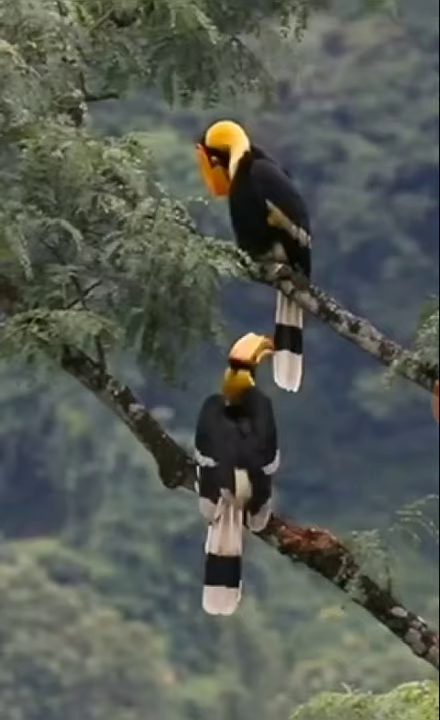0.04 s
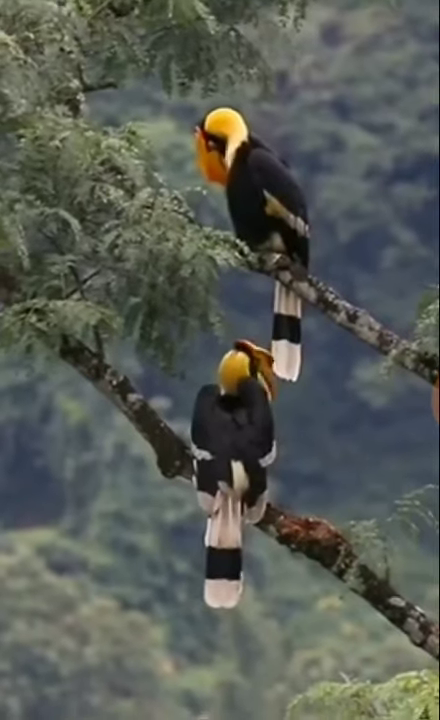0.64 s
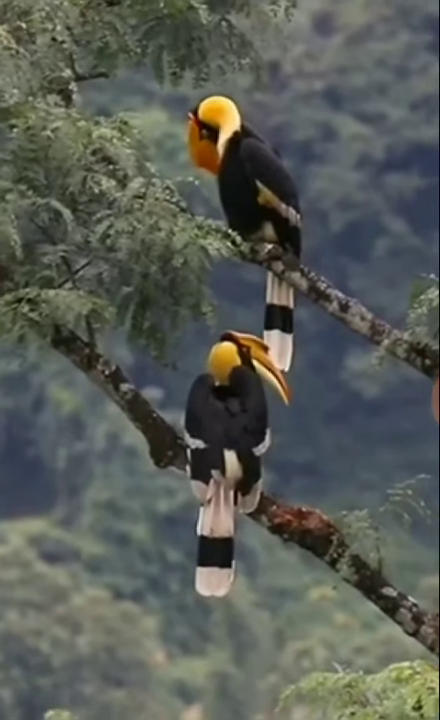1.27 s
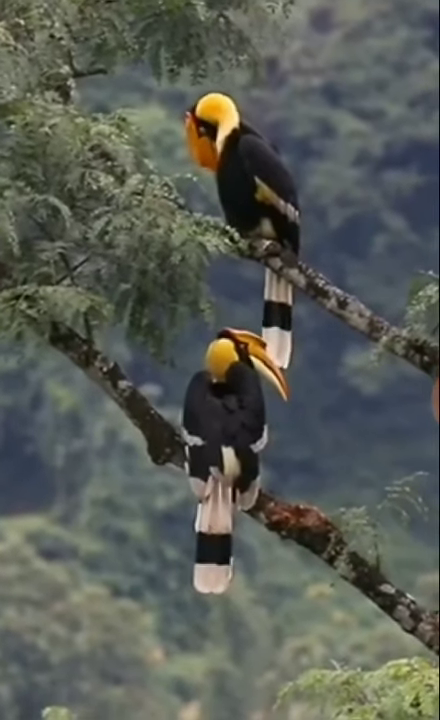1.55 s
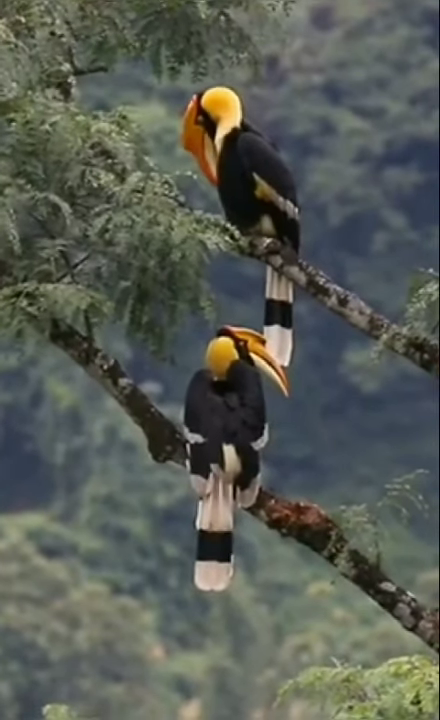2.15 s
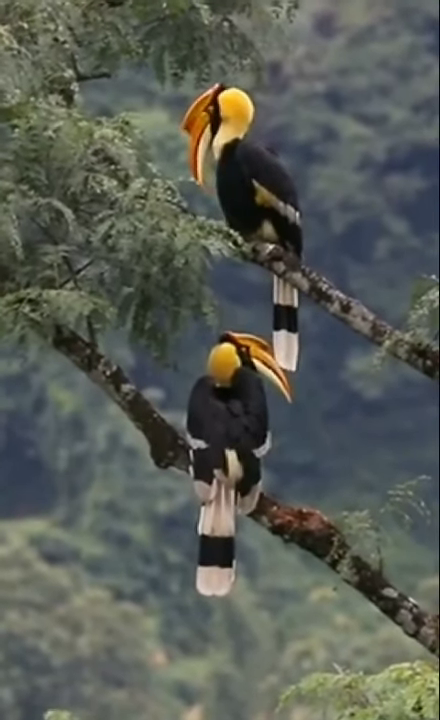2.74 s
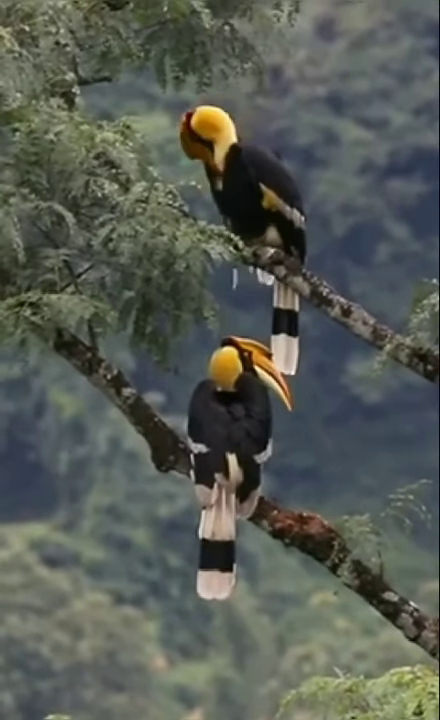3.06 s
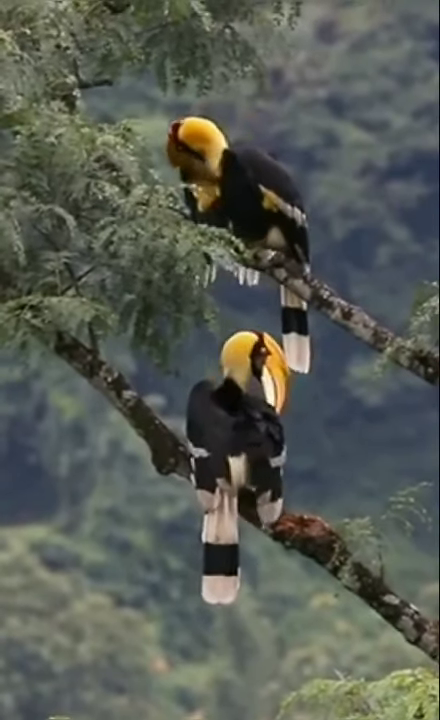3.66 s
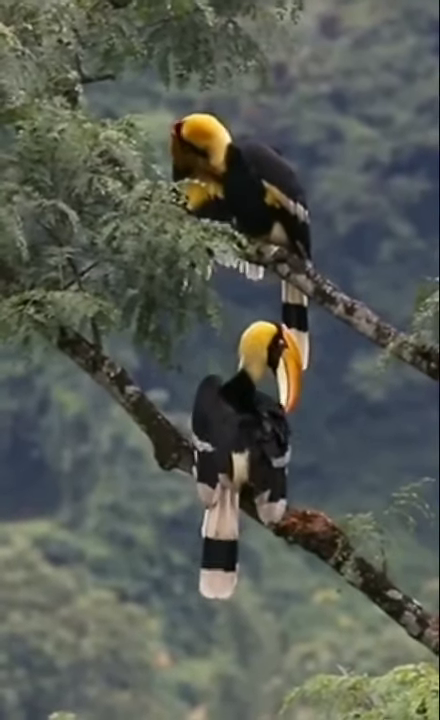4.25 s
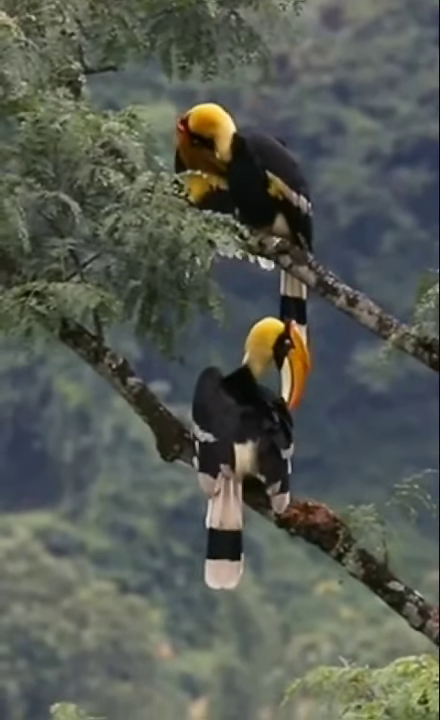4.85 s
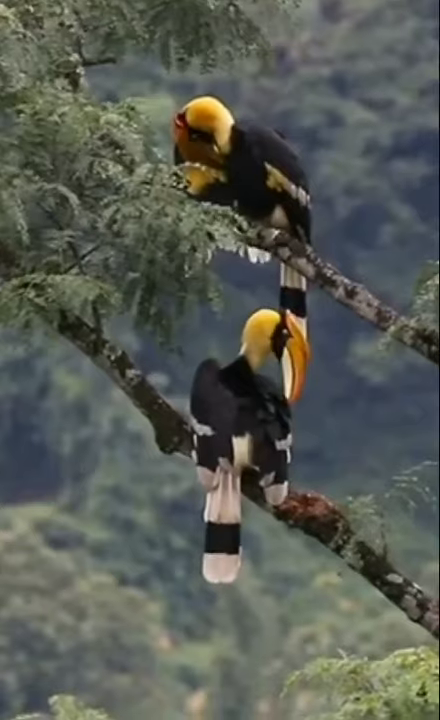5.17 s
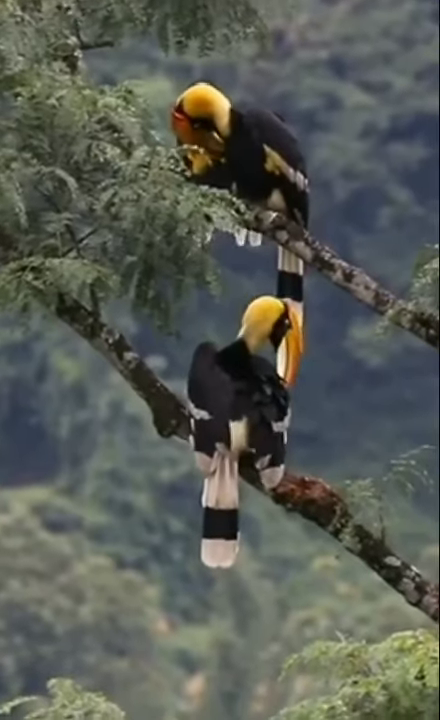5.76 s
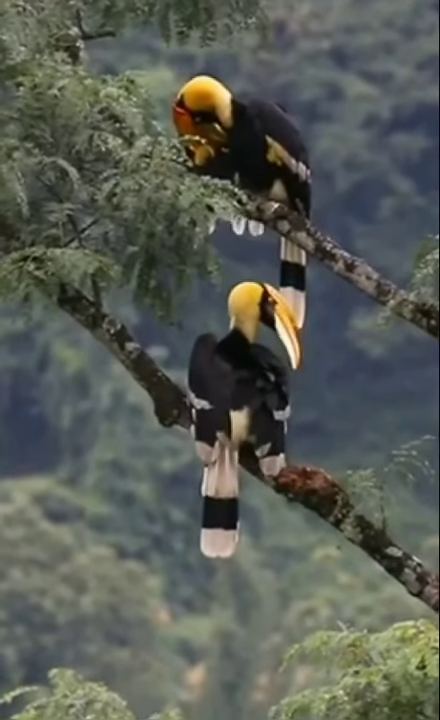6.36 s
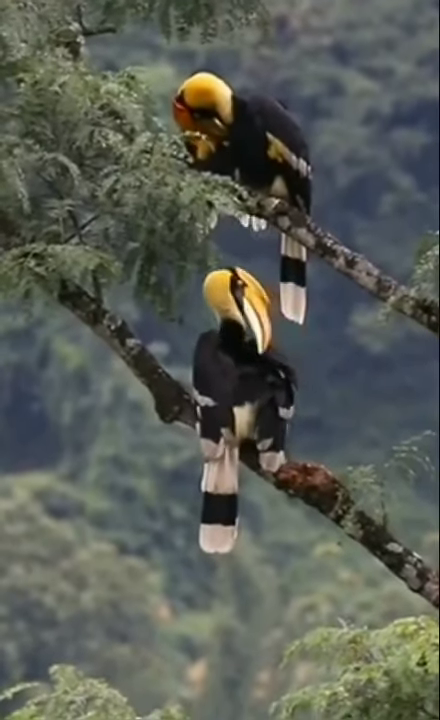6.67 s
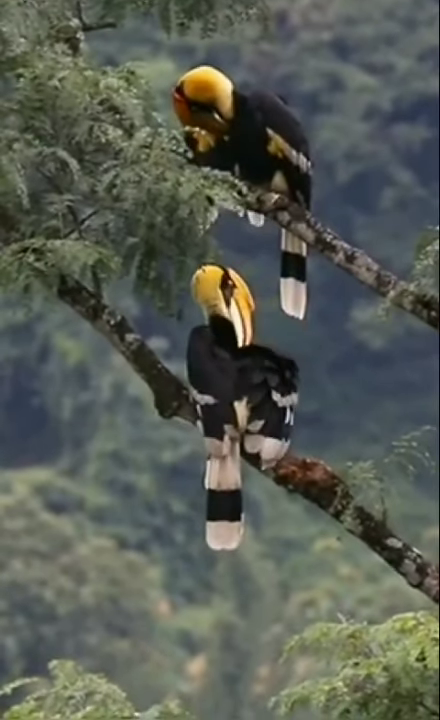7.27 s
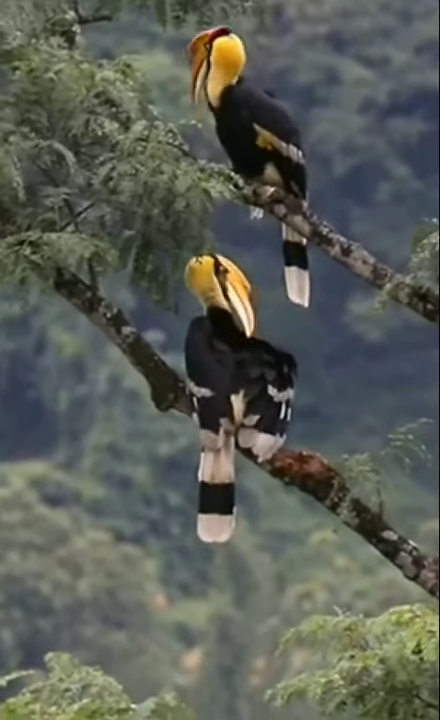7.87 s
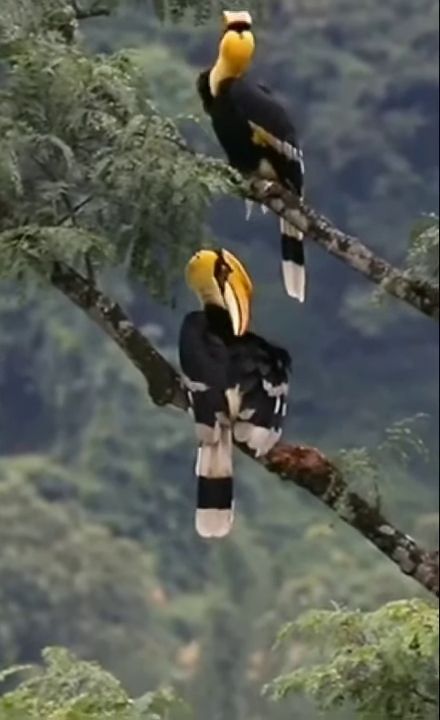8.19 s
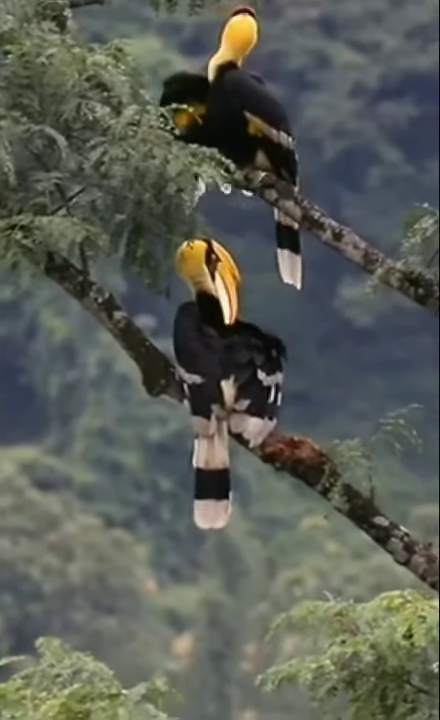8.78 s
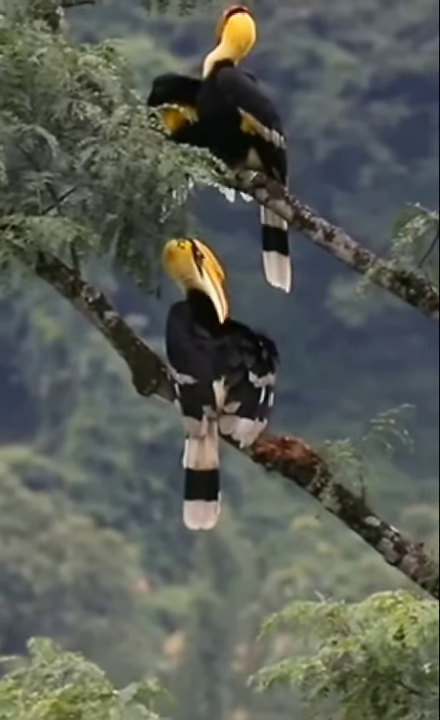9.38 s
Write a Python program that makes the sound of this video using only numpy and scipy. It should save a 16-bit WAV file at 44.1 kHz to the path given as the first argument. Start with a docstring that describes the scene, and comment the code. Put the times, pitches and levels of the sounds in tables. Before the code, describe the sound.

In a forest valley, a bird's raspy, nasal calls repeat rapidly, swell and then thin out, each with a short echo from the trees. Faint chirps and gliding songbird whistles fill the gaps over a soft breeze and a wavering, far-off drone. The harsh calls return in brief bursts, a single dull knock follows, and a second bird finishes with alternating soft hoots and hoarse squeals, picked up in the open air.

```python
"""A bird's harsh, half-voiced calls come in quick series, over a low far-off drone and light wind.
Each call mixes regular and chaotic vibration of the syrinx, shaped by throat, mouth and bill.
Distant burry notes, thin chirps, a faint hum and a songbird's whistles come and go. Near the end,
after one dull knock, a second bird alternates soft hoots and squeals.
The trees of the forest valley echo every call."""
import sys
import numpy as np
from scipy import signal
from scipy.fft import rfft, irfft, next_fast_len
from scipy.io import wavfile
from scipy.ndimage import map_coordinates

SR = 44100
rng = np.random.default_rng(int(sys.argv[2]) if len(sys.argv) > 2 else 0)


def store_wav(level_fs):
    """Save 16-bit WAV to argv[1]."""
    pcm = np.round(np.clip(np.atleast_2d(level_fs), -1, 1) * 32767)
    wavfile.write(sys.argv[1], SR, pcm.T.astype(np.int16))


N = 419832
TOP_HZ = 15000


def amp(db):
    """Decibels to gain."""
    return 10 ** (np.asarray(db) / 20)


def unit(x):
    """Scale to rms 1."""
    return x / np.sqrt(np.mean(x ** 2) + 1e-20)


def along(points, hz):
    """Read (Hz, value) points on a log axis."""
    f, v = np.transpose(points)
    return np.interp(np.log(hz + 1), np.log(f + 1), v)


def curves(rows):
    """One value per sample for each column after the time."""
    times_s, *columns = np.transpose(rows)
    return [np.interp(np.arange(N) / SR, times_s, column) for column in columns]


def wobble(rate_hz, size=N):
    """Smooth random curve, rate_hz knots a second."""
    knots = rng.standard_normal(int(size * rate_hz / SR) + 4)
    return map_coordinates(knots, [np.arange(size) * rate_hz / SR])


def filtered(x, response):
    """Apply a frequency response."""
    n = x.shape[-1]
    m = next_fast_len(n + 2048)
    return irfft(rfft(x, m) * response(np.fft.rfftfreq(m, 1 / SR)), m)[..., :n]


def peak(hz, centre_hz, width_hz):
    """Gain of one resonance, 1 at its centre."""
    return 1 / (1 + (2 * (hz - centre_hz) / width_hz) ** 2)


def add(track, start_s, x):
    """Mix x into the track."""
    part = track[:, round(start_s * SR):][:, :x.shape[-1]]
    part += x[:, :part.shape[1]]


def swell(length_s, rise_s, fall_s):
    """Progress u through a note (1 at length_s) and its envelope."""
    t = np.arange(int((length_s + fall_s / 2) * SR)) / SR
    return t / length_s, np.clip(t / rise_s, 0, 1) * np.clip((t[-1] - t) / fall_s, 0, 1)


def arch(hz, u, bend, crest):
    """Pitch rises with the pressure behind a note and sags as it ends."""
    return hz * (1 - bend * (2 * (u - crest)) ** 2)


def phase(pitch_hz):
    """Running phase in radians."""
    return 2 * np.pi * np.cumsum(pitch_hz) / SR


# Forest reverberation. Each row: frequency in Hz, T60 in seconds.
FOREST_T60 = [(500, 0.39), (2200, 0.52), (4500, 0.65), (8000, 0.63), (14000, 0.64)]


def outdoors(x, lag_ms, pan_db, wet_db):
    """Direct sound, lag_ms later on the right, plus scatter from near branches and far trees."""
    hz, t, noise = signal.stft(rng.standard_normal((2, SR * 3 // 4)), SR, nperseg=256)
    trees = amp(-60 * t / along(FOREST_T60, hz)[:, None])
    branches = amp(7 - 60 * t / .017)
    tail = signal.istft(noise * (trees + branches), SR, nperseg=256)[1]
    echo = signal.fftconvolve(x[None], tail / np.linalg.norm(tail[0]), axes=1)
    side = np.array([[1], [-1]]) / 2
    padded = np.pad(x, (0, echo.shape[1] - len(x)))
    direct = filtered(padded, lambda f: np.exp(2j * np.pi * f * side * lag_ms / 1000))
    return amp(side * pan_db) * (direct + amp(wet_db) * echo) / np.hypot(1, amp(wet_db))


def rasp(beat_hz, throat, scatter, hiss, shudder_db):
    """Chaotic vibration: uneven pulses and turbulence; resonances sink as the bill closes."""
    n, sag = len(beat_hz), .0072
    beats = np.flatnonzero(np.diff(np.floor(np.cumsum(beat_hz) / SR)))
    late, size = rng.standard_normal((2, len(beats)))
    onsets = np.clip(beats + late * scatter * SR / beat_hz[beats], 0, n - 1).astype(int)
    flow = unit(np.bincount(onsets, amp(2.5 * size), n)) + hiss * rng.standard_normal(n)
    flow *= amp(shudder_db * wobble(261.3, n))
    opened = filtered(flow, lambda f: throat(f * (1 - sag / 2)))
    closed = filtered(flow, lambda f: throat(f * (1 + sag / 2)))
    return unit(opened + np.linspace(0, 1, n) * (closed - opened))


def harsh(clear, rough, share, bright_db):
    """Clear voice and rasp mixed by a changing share; a wider bill lifts the treble."""
    share = np.clip(share, 0, .97)
    mix = np.sqrt(share) * clear + np.sqrt(1 - share) * rough
    return unit(filtered(mix, lambda f: amp(bright_db * along([(2500, 0), (4500, 1)], f))))


def bill_opening(voice, u, shut_hz=2800, opening_share=.3):
    """The voice starts muffled and brightens as the bill opens."""
    muffled = filtered(voice, lambda f: 1 / np.hypot(1, (f / shut_hz) ** 2))
    return muffled + np.clip(u / opening_share, 0, 1) * (voice - muffled)


# Upper overtones of the ringing tone. Each row: harmonic number, level in dB.
RING_OVERTONES = [(3, -22), (4, -33.5), (5, -44), (6, -47)]


def ringing(hz, u, octave_db):
    """Shaky, arched tone whose octave grows through the call."""
    pitch_hz = arch(hz, u, bend=.072, crest=.52) * (1 + .007 * wobble(400, len(u)))
    harmonics = [(1, 0), (2, octave_db + 7.5 * (u - .5))] + RING_OVERTONES
    return unit(sum(amp(db + 2.5 * wobble(200, len(u))) * np.sin(k * phase(pitch_hz))
                    for k, db in harmonics))


# Resonances shared by all harsh calls. Each row: centre in Hz, width in Hz, gain in dB.
THROAT_RESONANCES = [(842, 1400, -25.5), (2124, 304, 9.5), (4450, 940, 0.5), (4630, 1170, -7),
                     (5650, 570, -11), (6900, 1700, -46.5), (9740, 1600, -33.5), (14200, 1800, -47.5)]
# Harsh calls. Each row: start in seconds, length in seconds, rise as a share of length, pitch in Hz,
# relative level in dB, clearness 0-1, octave in dB, brightness in dB, throat resonance in Hz,
# its gain in dB, mouth resonance in Hz, its gain in dB, bill resonance gain in dB.
HARSH_CALLS = [(0.119, 0.083, .3, 2090, -62.5, 0.1, -3, 3.5, 1540, -12, 2730, 10.5, 4),
               (.252, 0.089, 0.16, 2167, -50.5, 0.55, -4, 1.5, 1600, -20, 2880, 5, 2),
               (0.438, 0.087, 0.33, 2095, -49.5, .15, -10, -0.5, 1590, -8, 2720, 9, 7),
               (0.606, 0.082, 0.43, 2086, -43.5, 0.2, -3, -0.5, 1610, -6, 2710, 5.5, 4.5),
               (0.792, 0.082, 0.16, 2125, -42, 0.34, -4.5, 0.5, 1620, -6, 2800, 4, 3),
               (0.974, 0.086, 0.22, 2190, -37.5, 0.56, 2, -3, 1560, -16, 2840, 3, 1.5),
               (1.136, 0.095, 0.36, 2144, -35.5, 0.29, 4, 1, 1380, -7, 2730, 10, 4.5),
               (1.338, .105, 0.29, 2159, -35, 0.01, -0.5, 0.5, 1420, -10, 2800, 9.5, 3.5),
               (1.578, 0.086, 0.18, 2270, -33, 0.53, -3, 1, 1550, -19, 2460, 6.5, 1),
               (1.758, 0.074, 0.26, 2227, -31.5, 0.69, -0.5, -1, 1600, -14, 2870, 2, 0.5),
               (1.928, 0.069, 0.39, 2137, -34, 0.17, -12, -3, 1560, -7, 2770, 10.5, 10),
               (2.098, 0.07, 0.51, 2068, -34, 0.12, -7, -3.5, 1540, -9, 2710, 9, 6.5),
               (3.354, 0.063, 0.47, 2198, -35.5, 0.12, -1.5, -4, 1585, -2, 2550, 6.5, 9),
               (3.53, 0.066, 0.5, 1910, -36.5, 0.2, -5, -.5, 1500, 11.5, 2610, 11, 8),
               (4.336, 0.066, 0.4, 2058, -44, 0.38, -6, -7.5, 1360, -7, 2600, 4, 8),
               (4.504, 0.062, 0.42, 2143, -42, 0.22, 11, -6.5, 1340, 1, 2670, 2, 11.5),
               (4.967, 0.054, 0.42, 2185, -47, 0.01, -8, -6, 1210, 6.5, 2640, 7.5, 9.5),
               (6.402, 0.081, 0.49, 2203, -30, 0.42, -13.5, -3, 1590, -23, 2830, 5, 0.5),
               (6.576, 0.085, 0.28, 2303, -28, 0.69, 3, -1.5, 1540, -13, 2890, 2.5, 1),
               (6.774, 0.06, 0.49, 2134, -31.5, 0.15, 1, -3, 1660, 4, 2790, 10.5, 6.5),
               (7.116, 0.062, 0.42, 2404, -32.5, 0.07, -6, -4, 1520, -7, 2580, 3, 5.5),
               (8.146, 0.035, 0.43, 1974, -43.5, 0.28, -8, -8, 1230, -3, 2530, 8.5, 8),
               (8.269, 0.11, 0.25, 2264, -29, 0.65, -2.5, -2, 1420, -18, 2820, 4, 4.5),
               (8.484, 0.077, 0.4, 2333, -27.5, 0.67, -8, 3.5, 1360, -1, 2900, 4.5, -1)]


def chatter():
    """First bird: a ringing tone over a nasal rasp; each call starts hoarse, then swells and clears."""
    out = np.zeros((2, N))
    for (start_s, length_s, rise, hz, db, clearness, octave_db, bright_db,
         throat_hz, throat_db, mouth_hz, mouth_db, bill_db) in HARSH_CALLS:
        u, envelope = swell(length_s, rise_s=rise * length_s, fall_s=.03)
        clear = ringing(hz, u, octave_db)
        stretch = 1 + .0119 * rng.standard_normal()
        resonances = THROAT_RESONANCES + [
            (throat_hz, 170, throat_db), (mouth_hz, 260, mouth_db), (3640, 350, bill_db)]
        throat = lambda f: sum(amp(gain_db) * peak(f, centre_hz * stretch, width_hz)
                               for centre_hz, width_hz, gain_db in resonances)
        beat_hz = hz / 3 * (1 + .05 * wobble(150, len(u)))
        rough = rasp(beat_hz, throat, scatter=.06, hiss=.47, shudder_db=3.5)
        ends = (2 * u - 1) ** 2  # 0 mid-call, 1 at either end
        hoarse = ends * np.where(u < .5, .87, .31)
        voice = harsh(clear, rough, 1.2 * clearness * (1 - hoarse), bright_db)
        air_bursts = amp(1.6 * wobble(124, len(u)))
        voice = bill_opening(unit(voice * air_bursts), u)
        call = amp(db + 2.15 + ends) * envelope ** 1.3 * voice
        add(out, start_s, outdoors(call, lag_ms=-.403, pan_db=2, wet_db=6.5))
    return out


# Stereo likeness of the wind. Each row: frequency in Hz, left-right correlation.
WIND_CORRELATION = [(100, 0.98), (250, 0.87), (500, 0.7), (1000, 0.0067), (8000, 0.041)]


def rush(spectrum):
    """Stereo noise of rms 1, alike in the bass and unrelated in the treble."""
    def response(hz):
        angle = np.arccos(np.clip(along(WIND_CORRELATION, hz), -1, 1)) / 2
        return amp(along(spectrum, hz)) * [np.cos(angle), np.sin(angle)]
    mid, side = filtered(rng.standard_normal((2, N)), response)
    return unit(np.array([mid + side, mid - side]))


# Two groups of drone tones. Each row: frequency in Hz, relative level in dB.
LOW_TONES = [(59, -4), (75, 6), (88, -6)]
UPPER_TONES = [(119, 0.5), (149, -0.5), (177, 3), (385, -27)]
# Wind rumble. Each row: frequency in Hz, relative density in dB.
RUMBLE_SPECTRUM = [(12, -31), (20, -20.5), (27, -31.5), (59, 2.5), (70, 0.5), (85, 4.5), (103, -15.5),
                   (177, -6), (248, -14), (400, -24), (520, -65.5), (880, -120)]
# Drone level, fading in with the scene. Each row: time in seconds, low group in dB, upper group in dB.
DRONE_LEVELS = [(.13, -97, -98), (.3, -76, -63), (1, -61, -64), (1.8, -48, -48), (2.4, -44.5, -45),
                (2.9, -58.5, -59.5), (3.35, -54, -53), (4.65, -54, -58), (5.8, -53.5, -61.5),
                (6.5, -55.5, -53.5), (6.7, -60.5, -65.5), (8.7, -63, -62), (9.5, -60, -68)]
# Swells of the low group and rumble. Each row: peak time in seconds, rise in dB.
LOW_SWELLS = [(2.73, 10.5), (3.079, 12), (4.1, 5.5), (4.38, 11), (5.76, 9.5)]
# Tones against rumble. Each row: time in seconds, tonal share of power 0-1.
TONAL_SHARE = [(0, 0.87), (2.5, 0.85), (6.3, 0.64), (6.9, 0.15), (9.5, 0.14)]


def drone():
    """Wavering low tones like a distant engine; they fade in with the scene, then sink into rumble."""
    t = np.arange(N) / SR
    swell_sigma_s, fading_db, fading_hz, sag_per_s = .049, 1.74, 5.4, .007
    low_db, upper_db = curves(DRONE_LEVELS)
    swell_db = sum(db * np.exp(-((t - s) / swell_sigma_s) ** 2 / 2) for s, db in LOW_SWELLS)
    low_gain = amp(low_db + swell_db + fading_db * wobble(fading_hz))
    upper_gain = amp(upper_db + fading_db * wobble(fading_hz))
    speed = 1 - sag_per_s * (t - 3)

    def wavering(group):
        return unit(sum(amp(db + 3.9 * wobble(7)) * np.sin(phase(hz * (speed + .0174 * wobble(12))))
                        for hz, db in group))
    tones = low_gain * wavering(LOW_TONES) + upper_gain * wavering(UPPER_TONES)
    rumble = np.hypot(low_gain, upper_gain) * rush(RUMBLE_SPECTRUM)
    tonal, = curves(TONAL_SHARE)
    return (np.sqrt(tonal) * tones + np.sqrt(1 - tonal) * rumble) * amp([[.5], [-1.3]])


# Breeze level, fading in with the scene over the first two seconds.
# Each row: time in seconds, relative level in dB.
BREEZE_LEVELS = [(0.3, -91), (0.74, -76.5), (2.04, -64.5), (2.95, -69), (3.35, -69.5), (4.61, -67),
                 (5.43, -68), (9.52, -59)]
# Breeze colour. Each row: frequency in Hz, relative density in dB.
BREEZE_SPECTRUM = [(22, -3), (35, 10), (100, 4.5), (250, -2), (380, 3.5), (520, -1), (900, -2.5),
                   (1500, -13), (2500, -16.5), (5000, -24.5), (6400, -29), (7400, -24.5), (8400, -31),
                   (11000, -30), (15000, -46.5)]


def breeze():
    """Soft air in the treetops."""
    level_db, = curves(BREEZE_LEVELS)
    flutter_db = wobble(6)
    return amp(level_db + 2.5 + flutter_db) * rush(BREEZE_SPECTRUM)


def whistle(length_s, first_hz, middle_hz, last_hz, db, burr, wet_db):
    """One gliding note, its pitch shaken by a burr; with distance it is mostly echo."""
    u, envelope = swell(length_s, rise_s=.02, fall_s=.03)
    glide_hz = np.polyval(np.polyfit([0, .5, 1], [first_hz, middle_hz, last_hz], 2), u)
    pitch_hz = glide_hz * (1 + burr * wobble(700, len(u)))
    note = unit(np.sin(phase(pitch_hz)) * amp(2 * wobble(90, len(u))))
    return outdoors(amp(db) * envelope * note, lag_ms=0, pan_db=2.5, wet_db=wet_db)


# Distant notes. Each row: start in seconds, length in seconds, first, middle and last pitch in Hz,
# level in dB, relative burr.
FAR_SONG = [(2.495, 0.078, 3520, 3190, 3190, -64, 0.074), (2.535, 0.073, 2760, 2896, 3035, -53.5, 0.064),
            (2.61, 0.077, 3150, 3180, 3170, -67, 0.063), (3.757, 0.095, 3200, 2864, 3200, -56.5, 0.11),
            (6.917, .14, 3915, 3875, 3840, -52, 0.048), (7.617, 0.18, 3045, 3220, 3320, -64, 0.13)]


def far_bird():
    """Burry notes from across the valley."""
    out = np.zeros((2, N))
    for start_s, *note in FAR_SONG:
        add(out, start_s, whistle(*note, wet_db=8))
    return out


# High chirps. Each row: start in seconds, middle pitch in Hz, glide in Hz, level in dB.
HIGH_CHIRPS = [(2.554, 6220, -700, -68.5), (2.866, 6130, -850, -70), (4.206, 5740, -600, -74),
               (5.277, 5260, 694, -67), (5.48, 5610, 697, -63), (6.182, 5930, -550, -72),
               (8.074, 5630, 606, -75)]


def chirps(length_s=.03):
    """A small bird's thin, straight glides, up or down."""
    out = np.zeros((2, N))
    for start_s, hz, glide_hz, db in HIGH_CHIRPS:
        chirp = whistle(length_s, hz - glide_hz / 2, hz, hz + glide_hz / 2, db, burr=.016, wet_db=7.5)
        add(out, start_s, chirp)
    return out


# Faint hums. Each row: start in seconds, length in seconds, pitch in Hz, level in dB.
FAINT_HUMS = [(4.121, 0.49, 380.6, -67), (5.737, 0.19, 377, -70), (6.413, 0.21, 383, -68.5)]


def hums():
    """A soft, wavering tone comes and goes above the drone."""
    out = np.zeros((2, N))
    for start_s, length_s, hz, db in FAINT_HUMS:
        u, envelope = swell(length_s, rise_s=.06, fall_s=.1)
        tone = unit(np.sin(phase(hz + 3 * wobble(25, len(u)))))
        add(out, start_s, (amp(db) * envelope * tone)[None])
    return out


# Songbird notes. Each row: start in seconds, length in seconds, first, middle and last pitch in Hz,
# level in dB, relative burr, echo over direct sound in dB.
SONG_NOTES = [(4.74, 0.093, 4000, 4180, 3970, -66.5, 0.012, -2),
              (5.215, .13, 3950, 2960, 2843, -54.5, .018, 15),
              (5.34, 0.15, 2800, 3463, 3407, -50, 0.0055, 7.5),
              (5.6, 0.12, 5370, 4480, 3550, -51, 0.018, 16),
              (5.78, 0.096, 5680, 4700, 4250, -62, 0.0067, -6.5),
              (5.788, 0.092, 3710, 3270, 3015, -50.5, 0.0076, 11),
              (5.958, .125, 4840, 4990, 5000, -68.5, 0.0087, -2),
              (6.01, 0.18, 2410, 2463, 2500, -58.5, 0.0045, 3.5),
              (6.078, 0.074, 5020, 4070, 3140, -63.5, .008, 1),
              (6.32, 0.097, 2690, 3040, 3070, -48.5, 0.01, 23.5)]


def songbird():
    """A phrase of gliding whistles, further off among the trees."""
    out = np.zeros((2, N))
    for start_s, *note in SONG_NOTES:
        add(out, start_s, whistle(*note))
    return out


def knock(start_s=8.578, hz=480, db=-43, t60_s=.04):
    """One dull knock among the branches: a noise burst through a broad resonance."""
    t = np.arange(SR // 10) / SR
    burst = rng.standard_normal(len(t)) * amp(-60 * t / t60_s)
    thud = filtered(burst, lambda f: peak(f, hz, hz))
    out = np.zeros((2, N))
    add(out, start_s, outdoors(amp(db) * thud / np.abs(thud).max(), lag_ms=0, pan_db=0, wet_db=-9))
    return out


def voiced(pitch_hz, throat):
    """Regular vibration of the syrinx: harmonics shaped by the throat."""
    k = np.arange(1, int(TOP_HZ / pitch_hz.max()) + 1)[:, None]
    harmonics = np.sin(k * phase(pitch_hz) + rng.uniform(0, 2 * np.pi, k.shape))
    return unit(np.sum(throat(k * pitch_hz) * harmonics, 0))


# Hoot colour. Each row: frequency in Hz, gain in dB.
HOOT_SPECTRUM = [(900, -9), (1800, 7), (2750, 5.5), (3700, -4), (4600, -11), (5500, -22), (9000, -37.5)]
# Soft hoots. Each row: start in seconds, pitch in Hz, level in dB.
HOOT_NOTES = [(8.618, 881, -39.5), (8.816, 944, -31.5), (9.016, 943, -32.5), (9.231, 935, -35.5),
              (9.412, 867, -40.5)]


def hoots():
    """Second bird: clean, low, arched notes that alternate with its squeals."""
    out = np.zeros((2, N))
    for start_s, hz, db in HOOT_NOTES:
        u, envelope = swell(length_s=.09, rise_s=.035, fall_s=.04)
        pitch_hz = arch(hz, u, bend=.055, crest=.5) * (1 + .003 * wobble(300, len(u)))
        note = voiced(pitch_hz, lambda f: amp(along(HOOT_SPECTRUM, f)))
        add(out, start_s, outdoors(amp(db) * envelope * note, lag_ms=.19, pan_db=-2.5, wet_db=0))
    return out


# Colours of a squeal's rasp and clear voice. Each row: frequency in Hz, gain in dB.
SQUEAL_ROUGH = [(400, -41), (1100, -21), (1450, -7.5), (1750, -14.5), (2150, 3.5), (2450, 0.5), (2850, 3),
                (3300, -6), (4400, 1), (5000, -8), (5700, -12), (7500, -17.5), (10000, -26), (15000, -43)]
SQUEAL_CLEAR = [(700, -28), (1450, -6.5), (2200, 1), (2900, 2), (4400, 1), (5000, -1), (5800, -5.5),
                (6700, -7), (7400, -3.5), (8400, -16), (9000, -25), (10100, -26), (11700, -26.5),
                (15000, -33.5)]
# Squeals. Each row: start in seconds, length in seconds, pitch in Hz, level in dB, clear share 0-1,
# brightness in dB, bill resonance in Hz, its gain in dB, relative pitch bend,
# pitch crest and voice break as shares of length.
SQUEAL_CALLS = [(8.694, 0.094, 1481, -26, 0.81, -5, 4440, 6.5, 0.088, 0.59, .72),
                (8.913, 0.055, 1565, -27, .5, 1, 4600, 7.5, .07, 0.86, 0.94),
                (8.94, 0.064, 724.5, -23, 0.64, 4.5, 3670, 15.5, 0.0098, 0.33, .95),
                (9.132, .097, 1684, -24, 0.94, 1, 4930, 3, .16, .44, 0.78),
                (9.319, .08, 1449, -24.5, 0.87, -4, 4260, 13.5, .2, .4, 0.78)]


def squeals(voice_in=.24, voice_edge=.15, broken_db=-3):
    """Second bird: each squeal starts hoarse, catches on an arching pitch and breaks into rasp."""
    out = np.zeros((2, N))
    # The highest overtones beam to the left.
    beam = lambda f: amp(np.array([[1], [-1]]) * along([(4000, .89), (8000, 4)], f))
    throat = lambda f: amp(along(SQUEAL_ROUGH, f))
    for (start_s, length_s, hz, db, share, bright_db,
         bill_hz, bill_db, bend, crest, breaks) in SQUEAL_CALLS:
        u, envelope = swell(length_s, rise_s=.3 * length_s, fall_s=.018)
        voicing = np.clip(np.minimum(u - voice_in, breaks - u) / voice_edge + .5, 0, 1)
        pitch_hz = arch(hz, u, bend, crest) * (1 + .005 * wobble(350, len(u)))
        colour = lambda f: amp(along(SQUEAL_CLEAR, f) + bill_db * peak(f, bill_hz, hz / 2))
        clear = unit(voiced(pitch_hz, colour) * amp(1.2 * wobble(250, len(u))))
        beat_hz = 721.7 * (1 + .04 * wobble(200, len(u)))
        rough = rasp(beat_hz, throat, scatter=.1, hiss=.5, shudder_db=3)
        voice = harsh(clear, rough, share * voicing, bright_db)
        call = amp(db + broken_db * (1 - voicing)) * envelope * voice
        add(out, start_s, filtered(outdoors(call, lag_ms=.21, pan_db=-3.5, wet_db=2.5), beam))
    return out


def scene():
    """The birds and the valley around them."""
    return (chatter() + drone() + breeze() + far_bird() + chirps() + hums() + songbird()
            + knock() + hoots() + squeals())


def record(dry, start_s=.125, fade_s=.011):
    """A moment of silence, a quick fade-in and a band limit."""
    fade = np.clip((np.arange(N) / SR - start_s) / fade_s, 0, 1)
    return filtered(dry * fade, lambda hz: hz < TOP_HZ)


dry = scene()
out = record(dry)
store_wav(out)
```